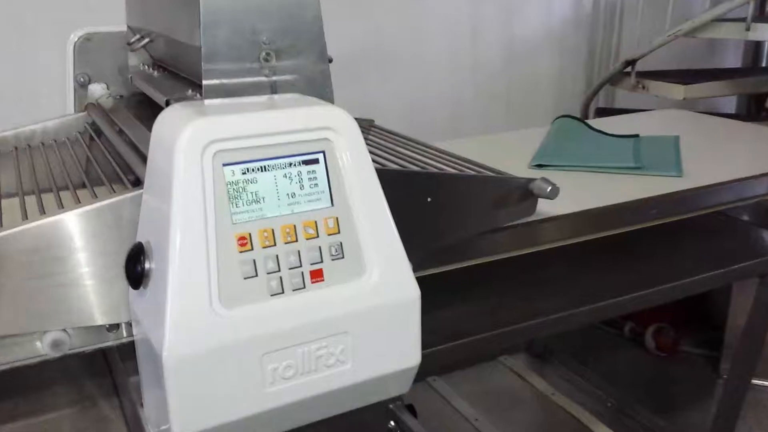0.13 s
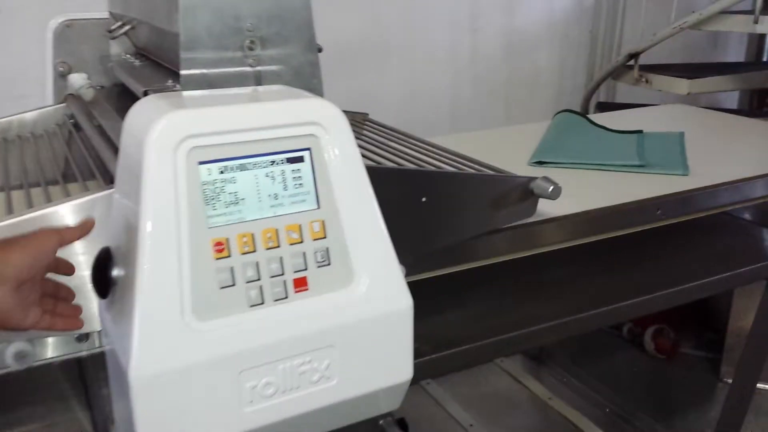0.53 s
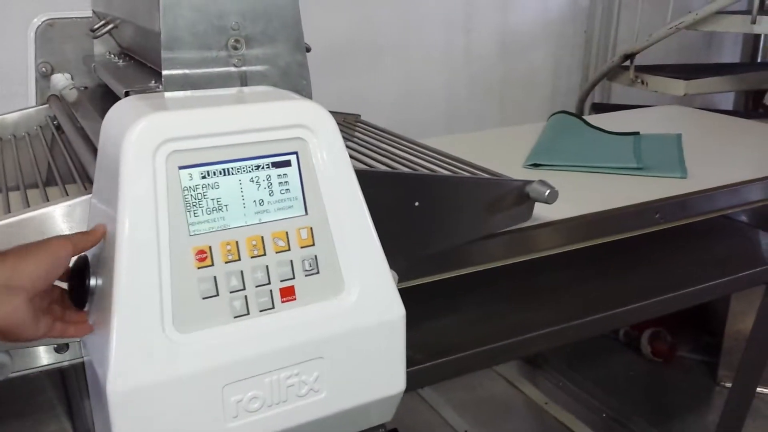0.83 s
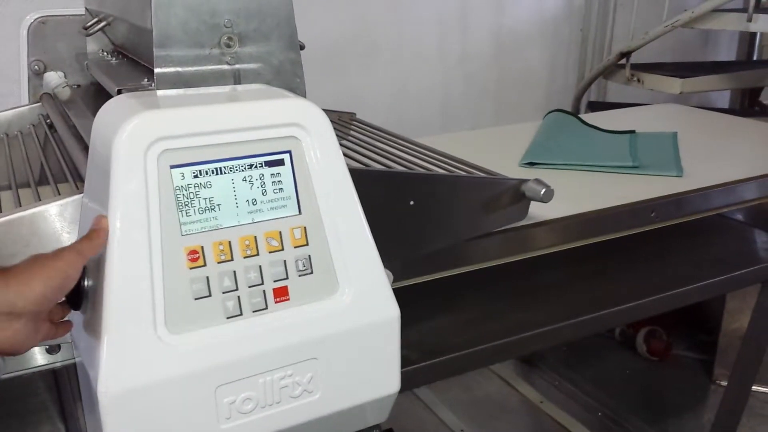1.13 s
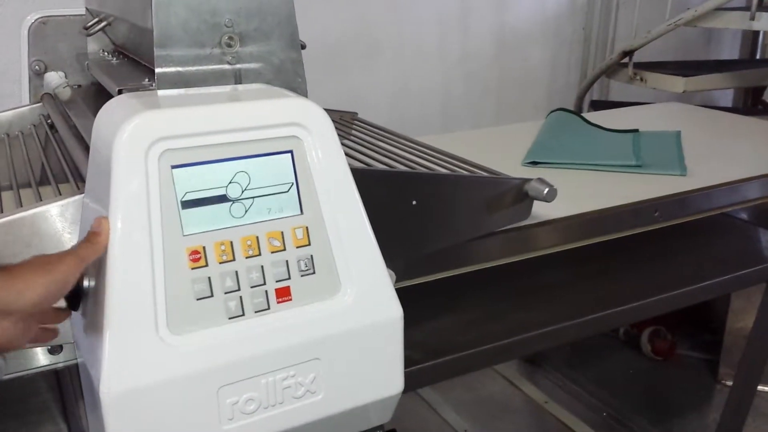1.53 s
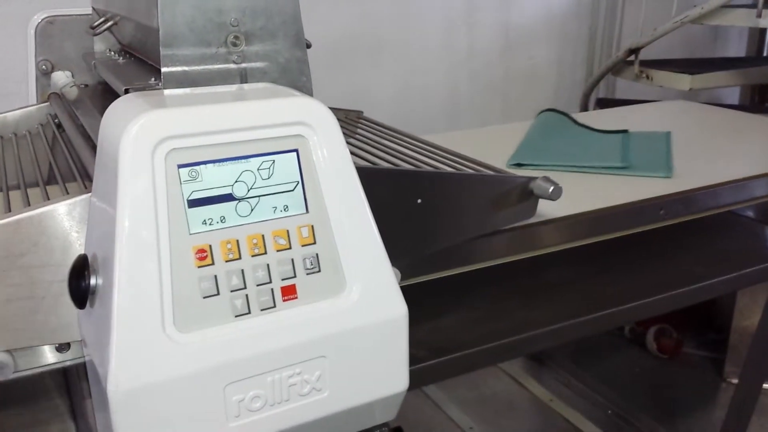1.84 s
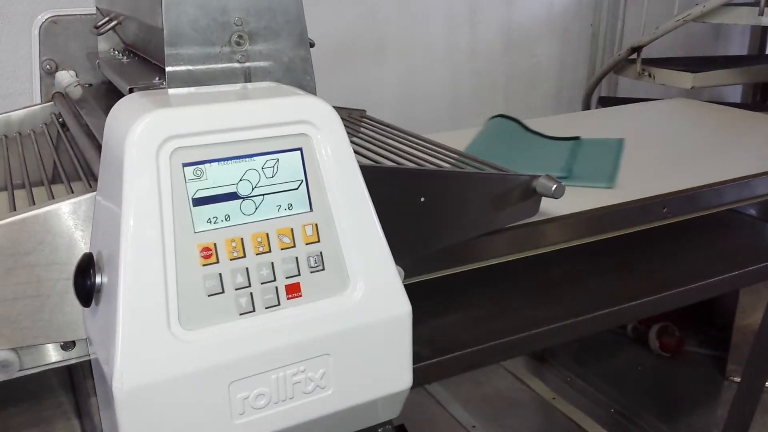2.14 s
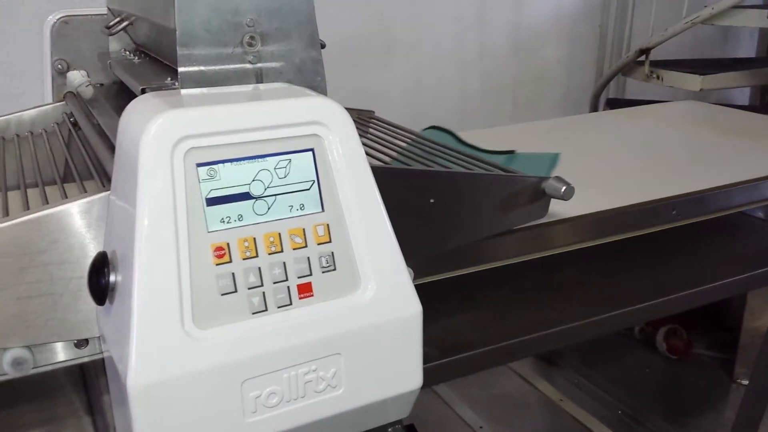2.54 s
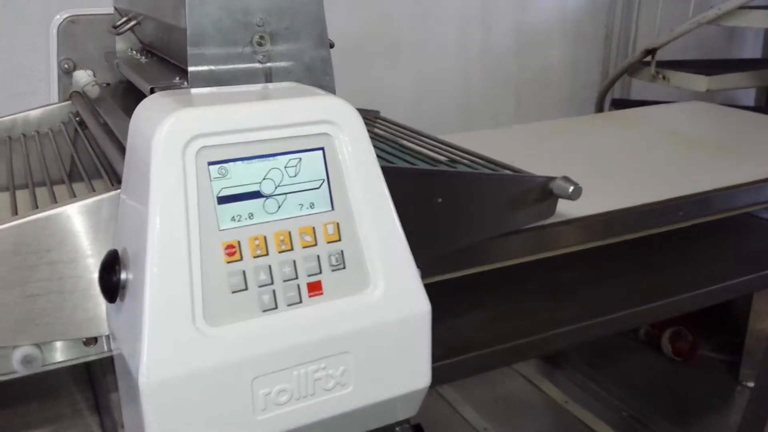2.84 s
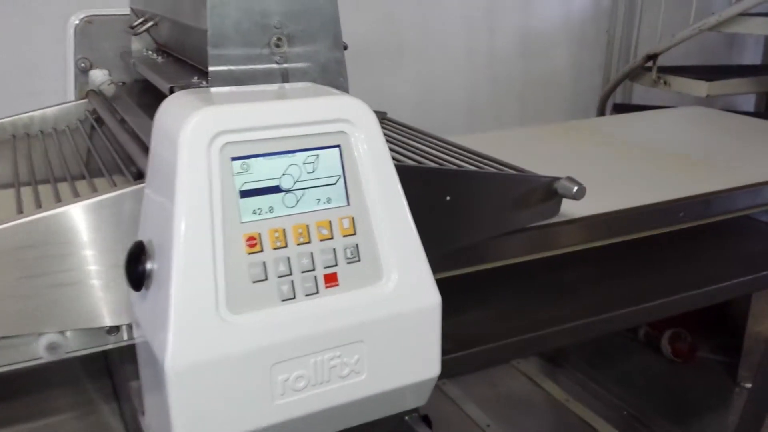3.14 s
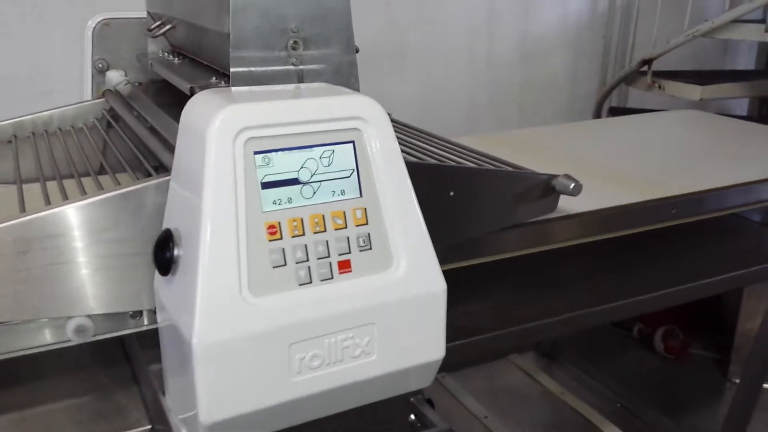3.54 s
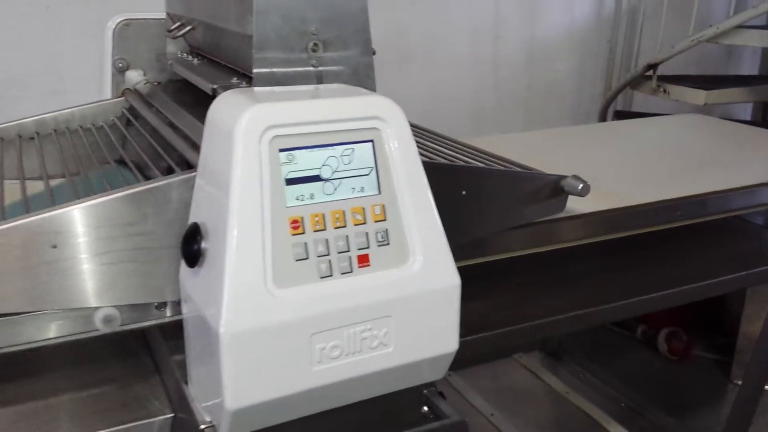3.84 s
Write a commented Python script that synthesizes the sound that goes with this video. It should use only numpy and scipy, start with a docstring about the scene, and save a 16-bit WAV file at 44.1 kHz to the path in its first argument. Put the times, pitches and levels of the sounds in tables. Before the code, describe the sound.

A dough rolling machine starts in a hard-walled bakery: brief silence, faint room hum, light finger ticks, sharp switch clunks, then a quick spin-up into steady gear whine and belt hiss, heard close in stereo.

```python
"""A dough sheeter starts up in a quiet hard-walled bakery. After silence the room opens: shaped noise, hums,
a whirr dying away. A hand brushes the plastic console (noise through a resonance), ticks it and presses the
start knob; a contactor clunks (clicks ring the housing modes, with echoes and noise tails). The motor spins up:
gear whine as sines on multiples of shaft speed, a frame shaken by noise, hissing belts and rollers, swelling
hums and dull knocks. A low rising moan sets in at the very end."""
import sys
import numpy as np
from scipy import signal
from scipy.io import wavfile

SR = 44100
rng = np.random.default_rng(int(sys.argv[2]) if len(sys.argv) > 2 else 0)


def transcribe(signal):
    """Save signal, clipped to [-1, 1], as a 16-bit WAV file at the path in sys.argv[1]."""
    frames = np.atleast_2d(signal).T
    limited = np.clip(frames, -1, 1)
    pcm = np.round(limited * 32767).astype(np.int16)
    wavfile.write(sys.argv[1], SR, pcm)


N = 176400

# Room tone spectrum. Each row: frequency in Hz, relative level in dB per Hz.
ROOM_SPECTRUM = [(15, -43), (25, -14), (134, -7), (173, -6.5), (280, -14), (326, -18), (371, -15),
                 (732, -23.5), (796, -21.5), (4000, -34.5), (8800, -120)]
# Stereo room tone. Each row: frequency in Hz, left-right likeness from -1 to 1.
ROOM_LIKENESS = [(60, 0.96), (180, 0.97), (530, 0.78), (1580, 0.02), (4690, 0.01), (14000, 0.1)]
# Stereo room tone. Each row: frequency in Hz, left minus right in dB.
ROOM_BALANCE = [(60, -2), (14000, 2)]
# Finger ticks on the console. Each row: start in seconds, strike level in dB, pitch in Hz.
TICKS = [(.652, -40, 2100), (.8835, -40, 4600), (.890, -41, 4600), (1.128, -46, 2000), (1.564, -42.5, 3500),
         (1.572, -39, 1800)]
# Blows on the housing. Each row: start in seconds, level in dB, crack above the blow in dB, crack pitch in Hz.
BLOWS = [(1.1205, -48, 3, 4020), (1.2442, -29.5, -1.5, 3400), (1.2484, -33.5, 7, 1910),
         (1.6365, -22, -5, 3720), (1.6414, -24.5, -12, 1500), (1.7637, -39, 20, 6450),
         (1.765, -30, 15, 1370)]
# Housing modes. Each row: frequency in Hz, relative level in dB, t60 in seconds.
HOUSING_MODES = [(132, -7, 0.17), (213, -4, 0.076), (261, 0, 0.083), (313, 2, 0.14), (392, -0.5, 0.05),
                 (505, -1, 0.099), (690, 0, 0.08), (793, 7, 0.035), (1045, -6, 0.037)]
# Diffuse tails of the blows. Each row: low edge in Hz, high edge in Hz, level re the blow in dB, t60 in seconds.
TAIL_BANDS = [(90, 390, -15.5, 0.74), (376, 538, -13.5, 0.37), (643, 964, -15, 0.5), (967, 1980, -22, 0.23),
              (2280, 4700, -32, 0.46)]
# Dull knocks, from the hand, then the running drive.
# Each row: start in seconds, strike level in dB before the band cut, pitch in Hz.
KNOCKS = [(.752, -43, 240), (1.134, -42, 327), (1.796, -17, 100), (2.295, -22, 213), (2.409, -18, 294),
          (2.595, -21, 363), (2.684, -18.5, 207), (2.963, -21.5, 246), (3.24, -19.5, 241),
          (3.385, -23, 115)]
# Frame hums as the load is taken up. Each row: centre in seconds, half length in seconds, pitch in Hz, peak rms in dB.
SWELLS = [(1.82, 0.036, 211, -27), (1.82, 0.054, 402, -31.5), (1.94, 0.11, 115, -32.5),
          (1.93, 0.041, 167, -29.5), (2.13, .05, 205, -29.5)]
# Belt and roller hiss spectrum. Each row: frequency in Hz, relative level in dB per Hz.
DRIVE_SPECTRUM = [(15, -53), (55, -15), (240, 0), (430, -2), (577, -10), (695, -2), (1030, -6), (1210, -5),
                  (1630, -9.5), (1960, -5.5), (2240, -21), (2700, -11.5), (6150, -17), (11000, -28.5),
                  (12900, -34.5), (14400, -61)]
# Belt and roller hiss over time. Each row: time in seconds, rms in dB.
DRIVE_LEVEL = [(1.752, -50), (1.764, -28.5), (1.80, -25), (1.85, -23.5), (2.12, -23.5), (2.6, -24.5),
               (3.2, -24.5), (4, -24.5)]
# Stereo hiss. Each row: frequency in Hz, left-right likeness from -1 to 1.
DRIVE_LIKENESS = [(60, 0.78), (150, 0.98), (370, 0.94), (910, 0.52), (2270, -0.12), (5630, 0.044),
                  (14000, -0.02)]
# Stereo hiss and whine. Each row: frequency in Hz, left minus right in dB.
DRIVE_BALANCE = [(60, -2), (210, -1.5), (490, 0), (740, 0.5), (1130, 2), (1720, 8), (2610, -7), (3970, 0.5),
                 (6030, 10.5), (9170, 1.5), (14000, -15.5)]
# Frame resonances. Each row: frequency in Hz, width in Hz, level in dB before the surge and the band cut.
FRAME_MODES = [(113.5, 7.6, -40.5), (165.8, 7.5, -40), (208.8, 8, -39.5), (304, 9.2, -38.5),
               (400.4, 4.5, -44), (433.8, 16, -39.5), (706.3, 20.5, -39), (953, 6.3, -41),
               (1487, 22, -41.5)]
# Gear whine tones. Each entry: multiple of the shaft speed.
WHINE_ORDERS = [5, 18, 22, 23, 24, 25, 26, 28, 29, 32, 33, 36, 37, 45, 46, 47, 48, 50, 72]
# Gear whine tones, same order. Each entry: rms in dB before waver and balance.
WHINE_DB = [-40, -37.5, -44, -45, -36, -39, -44.5, -42, -40.5, -47, -48, -38.5, -50, -35, -45.5, -44, -46,
            -48, -44.5]

FADE_START_S, FADE_S, FADE_DEPTH_DB = 0.388, 0.079, -22
CUTOFF_HZ = 14550
# microphone self-noise: flat part (level before its band cut) and a broad peak
HISS_DB, HISS_PEAK_HZ, HISS_PEAK_DB = -63, 6120, -68
ROOM_DB = -53
HUM_HZ, HUM_DB = 301.4, -61  # mains hum of other equipment, level before waver
LOW_HUM_HZ, LOW_HUM_DB = 148.3, -63.5  # rougher
WHIRR_DB, WHIRR_FADE_DB_PER_S, WHIRR_LOW_HZ, WHIRR_HIGH_HZ = -59, 27, 600, 2100
BRUSH_S, BRUSH_RISE_S, BRUSH_FALL_S, BRUSH_DB, BRUSH_HZ = 0.99, 0.04, 0.11, -59.5, 6450
TICK_T60_S, CRACK_T60_S = 0.002, 0.006
CONTACT_HZ = 1300  # softness of the blows
BAKERY_T60_S, WET_DB, WALL_CUT_HZ = 0.69, -18.5, 2500
MOAN_S, MOAN_RISE_S, MOAN_HZ, MOAN_GLIDE_HZ_PER_S, MOAN_DB = 3.964, 0.0099, 241, 1950, -15.5
KNOCK_T60_S, KNOCK_SOFT_HZ = 0.1, 500
ROLLER_RING_HZ, ROLLER_RING_DB = 5920, -41.5  # level before panning, at the last drive level
MOTOR_ON_S, SPIN_UP_S, SHAFT_HZ = 1.755, 0.04, 49.27  # spin-up is a time constant
# low modes shake harder while the load is taken up
SURGE_DB, SURGE_S, SURGE_BELOW_HZ = 11, 0.22, 260
FRAME_LUMP_DB, LUMPS_PER_S = 2.5, 10.6
WHINE_WAVER_DB, WAVER_PER_S, SPEED_JITTER = 3.0, 4.0, 0.00015  # jitter as a fraction of speed
MESH_ORDER, MESH_STEADINESS = 9, 0.4  # multiples of the gear mesh waver by this factor
WHINE_APART_HZ = 1160  # from here up, tones reach the two ears a quarter cycle apart
SAG_S, SAG_LENGTH_S, SAG_DB = 3.41, 0.21, -9  # the strongest tone dips briefly


def amp(db):
    """Decibels to amplitude."""
    return 10 ** (np.asarray(db) / 20)


def rms_one(x):
    """Scale to rms 1."""
    return x / np.sqrt(np.mean(x ** 2) + 1e-20)


def clock():
    """Time in seconds."""
    return np.arange(N) / SR


def in_time(rows):
    """Interpolate a (time, value) table."""
    return np.interp(clock(), *np.transpose(rows))


def at_hz(points, hz):
    """Interpolate a (frequency, value) table on log frequency."""
    points = np.array(points)
    return np.interp(np.log(hz), np.log(points[:, 0]), points[:, 1])


def drift(rate_hz):
    """Slow random wander of spread 1, made at SR / 40 by a double pole."""
    pole = np.exp(-80 * np.pi * rate_hz / SR)
    noise = rng.standard_normal(N // 40 + 2002)
    slow = signal.lfilter([1], [1, -2 * pole, pole * pole], noise)[2000:]  # skip the settling
    return np.interp(np.arange(N) / 40, np.arange(len(slow)), rms_one(slow - slow.mean()))


def ring(force, hz, t60_s):
    """Resonator: a unit click sets a decaying sine of height 1 ringing."""
    pole, w = amp(-60 / (t60_s * SR)), 2 * np.pi * hz / SR
    return signal.lfilter([0, np.sin(w)], [1, -2 * pole * np.cos(w), pole * pole], force + 1e-18)


def click(start_s, db):
    """One-sample impulse."""
    out = np.zeros(N)
    out[int(start_s * SR)] = amp(db)
    return out


def pan(db):
    """Left and right gains, left louder by db."""
    return amp([[db / 2], [-db / 2]])


def band(x, low_hz, high_hz):
    """Butterworth band-pass."""
    return signal.sosfilt(signal.butter(2, [low_hz, high_hz], "band", fs=SR, output="sos"), x)


def banded_noise(spectrum, likeness, balance, patchy_db, flicker_hz):
    """Third-octave bands of stereo noise, each with its own level, flicker, likeness and balance; rms 1."""
    out, together = 0, drift(3.0)
    edges_hz = 22 * 2 ** (np.arange(29) / 3)
    white = rng.standard_normal((2, 2, N))
    for k, (low_hz, high_hz) in enumerate(zip(edges_hz, edges_hz[1:])):
        mid, side = band(white[k % 2], low_hz, high_hz)
        hz = np.sqrt(low_hz * high_hz)
        alike = np.clip(at_hz(likeness, hz), -1, 1)
        level_db = at_hz(spectrum, hz) - 30 * (hz > spectrum[-1][0])
        gain = amp(level_db + patchy_db * (0.3 * together + drift(flicker_hz)))
        stereo = np.sqrt(1 + alike) * mid + np.sqrt(1 - alike) * side * [[1], [-1]]
        out = out + gain * pan(at_hz(balance, hz)) * stereo
    return rms_one(out)


def room_tone():
    """Distant ventilation as banded noise, a wavering sine hum, a rough hum and a far whirr dying away."""
    hum = amp(HUM_DB + 2.0 * drift(2.3)) * np.sqrt(2) * np.sin(2 * np.pi * HUM_HZ * clock())
    low_hum = amp(LOW_HUM_DB) * rms_one(ring(rng.standard_normal(N), LOW_HUM_HZ, 0.34))
    whirr = rms_one(band(rng.standard_normal((2, N)), WHIRR_LOW_HZ, WHIRR_HIGH_HZ))
    whirr = whirr * amp(WHIRR_DB - WHIRR_FADE_DB_PER_S * (clock() - FADE_START_S))
    air = banded_noise(ROOM_SPECTRUM, ROOM_LIKENESS, ROOM_BALANCE, patchy_db=1.0, flicker_hz=8.3)
    return amp(ROOM_DB) * air + hum + low_hum + whirr


def bakery(x):
    """Hard-wall echoes: six feedback delays a side, duller on every round."""
    out, dull = np.zeros((2, N)), np.exp(-2 * np.pi * WALL_CUT_HZ / SR)
    lags = (rng.uniform(0.014, 0.04, 12) * SR).astype(int)
    for k, lag in enumerate(lags):
        loop, state = x.copy(), [0.]
        gain = amp(-60 * lag / SR / BAKERY_T60_S)
        for i in range(lag, N, lag):
            back, state = signal.lfilter([gain * (1 - dull)], [1, -dull], loop[i - lag:i], zi=state)
            loop[i:i + lag] += back[:N - i]
        out[k % 2] += (loop - x) * (-1) ** (k // 2)
    return out


def tails():
    """Panels and room smear every blow into noise that dies away band by band."""
    blows = sum(click(start_s, db) for start_s, db, _, _ in BLOWS) ** 2
    out = 0
    for low_hz, high_hz, db, t60_s in TAIL_BANDS:
        power = signal.lfilter([1], [1, -amp(-120 / (t60_s * SR))], blows + 1e-18)
        noise = band(rng.standard_normal((2, N)), low_hz, high_hz)
        mid, side = rms_one(band(noise, low_hz, high_hz))  # second pass steepens the edges
        stereo = mid + min(high_hz / 2000, 1) * side * [[1], [-1]]
        out = out + amp(db) * np.sqrt(power) * stereo
    return out


def hand():
    """Grainy noise through a resonance brushes the plastic; clicks ring briefly as finger ticks."""
    t = clock() - BRUSH_S
    swell = np.exp(-(t / np.where(t < 0, BRUSH_RISE_S, BRUSH_FALL_S)) ** 2)
    grains = rng.standard_normal((2, N)) * amp(2.4 * drift(150.0))
    brush = amp(BRUSH_DB) * swell * rms_one(ring(grains, BRUSH_HZ, 0.0015))
    ticks = sum(ring(click(start_s, db), hz, TICK_T60_S) for start_s, db, hz in TICKS)
    return brush + ticks


def housing():
    """Every blow cracks and strikes each housing mode with a random strength of its own."""
    chance_db = rng.normal(0, 2.8, (len(BLOWS), len(HOUSING_MODES)))
    body, cracks = 0, 0
    for k, (hz, mode_db, t60_s) in enumerate(HOUSING_MODES):
        clicks = sum(click(blow[0], blow[1] + mode_db - 9 + chance_db[i, k]) for i, blow in enumerate(BLOWS))
        body = body + ring(clicks, hz, t60_s)
    for start_s, db, crack_db, hz in BLOWS:
        crack = ring(click(start_s, db + crack_db), hz, CRACK_T60_S)
        cracks = cracks + band(crack, hz / 1.7, hz * 1.45)
    return band(body, 65, CONTACT_HZ) + cracks


def moan():
    """A low sine that swells in while its pitch glides up."""
    t = np.maximum(clock() - MOAN_S, 0)
    swell = np.clip(t / MOAN_RISE_S, 0, 1) ** 2
    phase = 2 * np.pi * (MOAN_HZ + MOAN_GLIDE_HZ_PER_S * t / 2) * t
    return amp(MOAN_DB) * np.sqrt(2) * swell * np.sin(phase)


def swells_and_knocks():
    """Sine hums rise and fall smoothly; knocks are soft blows that ring briefly."""
    t, hums = clock(), 0
    for centre_s, half_s, hz, db in SWELLS:
        bell = np.exp(-((t - centre_s) / half_s) ** 2)
        hums = hums + amp(db) * np.sqrt(2) * bell * np.sin(2 * np.pi * hz * t)
    knocks = sum(ring(click(start_s, db), hz, KNOCK_T60_S) for start_s, db, hz in KNOCKS)
    return hums + band(knocks, 98, KNOCK_SOFT_HZ)


def belts_and_rollers():
    """Hiss of belts and rollers: banded noise plus a broad bright ring, both following the drive level."""
    noise = banded_noise(DRIVE_SPECTRUM, DRIVE_LIKENESS, DRIVE_BALANCE, patchy_db=2.1, flicker_hz=11.0)
    bright = rms_one(ring(rng.standard_normal((2, N)), ROLLER_RING_HZ, 0.0031))
    bright = amp(ROLLER_RING_DB) * bright * pan(16.0)
    level_db = in_time(DRIVE_LEVEL)
    hiss = amp(level_db) * noise + bright * amp(level_db - DRIVE_LEVEL[-1][1])
    return (clock() > MOTOR_ON_S) * hiss


def frame():
    """Lumpy random shaking drives the steel frame's resonances."""
    t, out = clock() - MOTOR_ON_S, 0
    surge_db = SURGE_DB * np.exp(-np.maximum(t, 0) / SURGE_S)
    for hz, width_hz, db in FRAME_MODES:
        t60_s = np.log(1000) / np.pi / width_hz
        force = rng.standard_normal(N) * amp(FRAME_LUMP_DB * drift(LUMPS_PER_S))
        steady_rms = np.sqrt(np.mean(ring(force, hz, t60_s) ** 2))
        surge = amp(surge_db / (1 + (hz / SURGE_BELOW_HZ) ** 4))
        force = force / steady_rms * (t > 0.015) * surge
        out = out + amp(db) * ring(force, hz, t60_s)
    return band(out, 96, 2060)


def gear_whine():
    """Gear teeth sing on whole multiples of the shaft speed; each tone wavers on its own."""
    speed = 1 - np.exp(-np.maximum(clock() - MOTOR_ON_S, 0) / SPIN_UP_S)
    turn = 2 * np.pi * np.cumsum(SHAFT_HZ * speed * (1 + SPEED_JITTER * drift(9.1))) / SR
    sag_db = SAG_DB * np.exp(-((clock() - SAG_S) / SAG_LENGTH_S) ** 2)
    out = 0
    for order, db in zip(WHINE_ORDERS, WHINE_DB):
        hz = order * SHAFT_HZ
        ear_phase = np.array([[0], [1]]) * np.pi / 2 * min(hz / WHINE_APART_HZ, 1) ** 2
        phase = rng.uniform(0, 2 * np.pi) + ear_phase
        waver_db = WHINE_WAVER_DB * (MESH_STEADINESS if order % MESH_ORDER == 0 else 1) * drift(WAVER_PER_S)
        level_db = db + (db == max(WHINE_DB)) * sag_db + waver_db
        out = out + amp(level_db) * pan(at_hz(DRIVE_BALANCE, hz)) * np.sin(order * turn + phase)
    return np.sqrt(2) * speed ** 10.0 * out


def scene():
    """Sum the room, the hand, the blows with their echoes, and the running machine."""
    blows = housing()
    start = hand() + blows * pan(2.0) + amp(WET_DB) * bakery(blows) + tails()
    machine = gear_whine() + frame() + swells_and_knocks() + belts_and_rollers() + moan()
    return room_tone() + start + machine


def record(dry):
    """After silence the scene fades in over the microphone's hiss; the top is cut."""
    t = clock() - FADE_START_S
    fade = amp(FADE_DEPTH_DB * np.clip(1 - t / FADE_S, 0, 1))
    white = rng.standard_normal((2, 2, N))
    hiss = amp(HISS_DB) * band(white[0], 4000, 16000)
    hiss = hiss + amp(HISS_PEAK_DB) * rms_one(ring(white[1], HISS_PEAK_HZ, 0.0021))
    top_cut = signal.cheby2(16, 70, CUTOFF_HZ, fs=SR, output="sos")
    return signal.sosfilt(top_cut, (t > 0) * (dry * fade + hiss))


dry = scene()
out = record(dry)
transcribe(out)
```